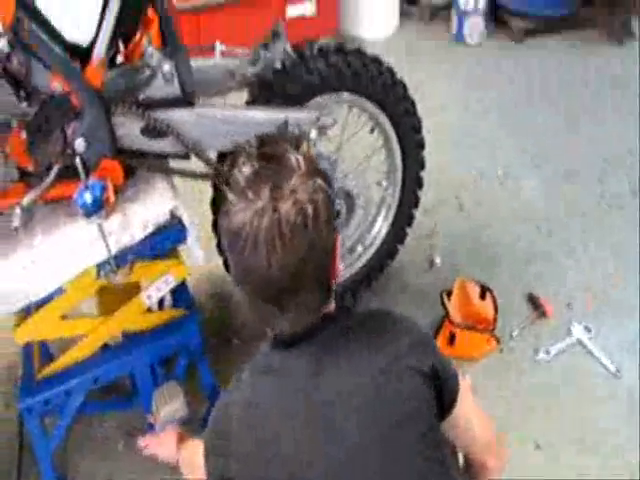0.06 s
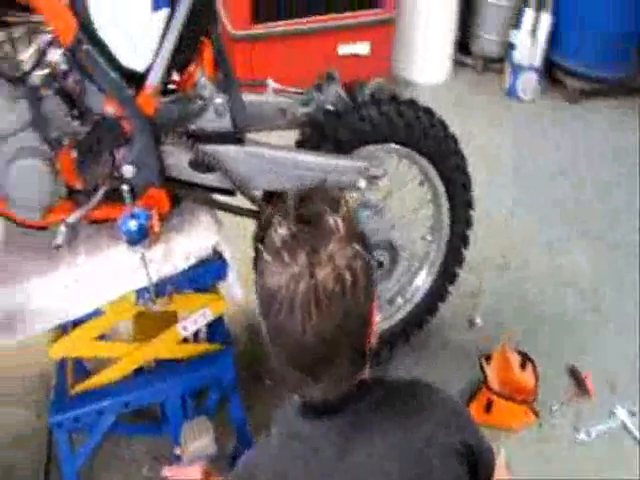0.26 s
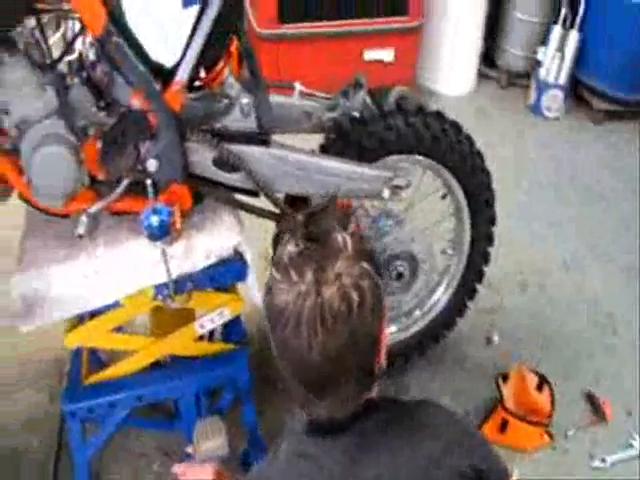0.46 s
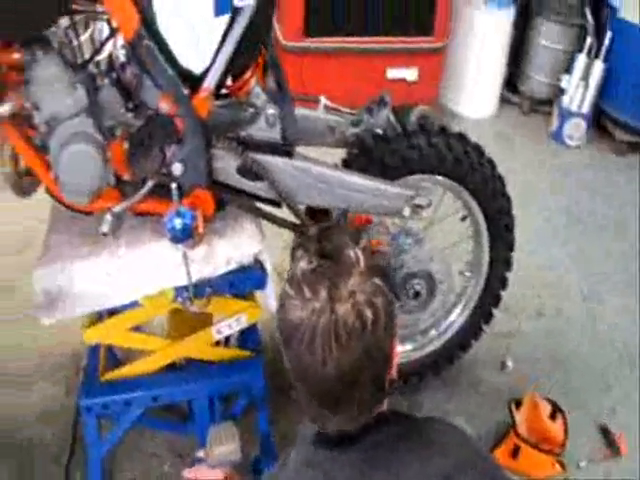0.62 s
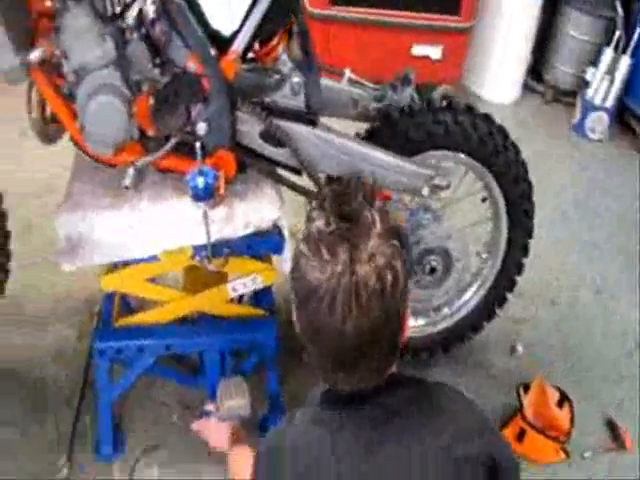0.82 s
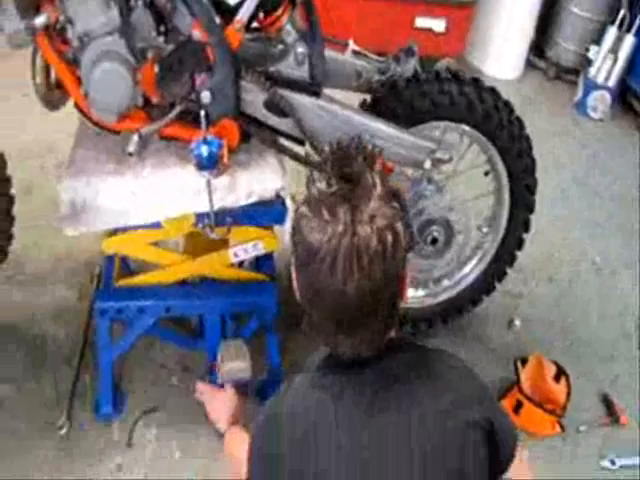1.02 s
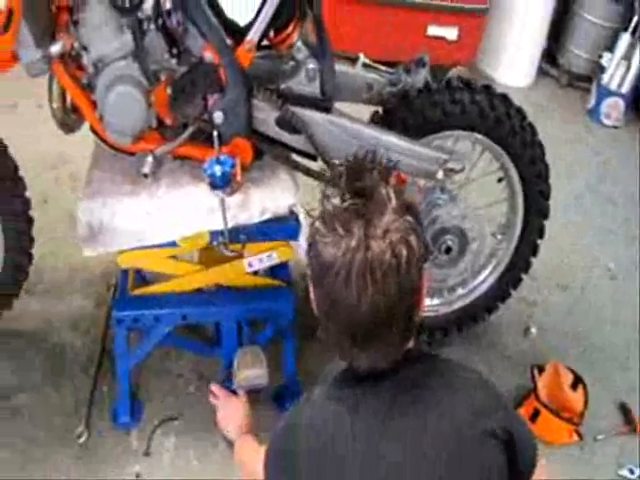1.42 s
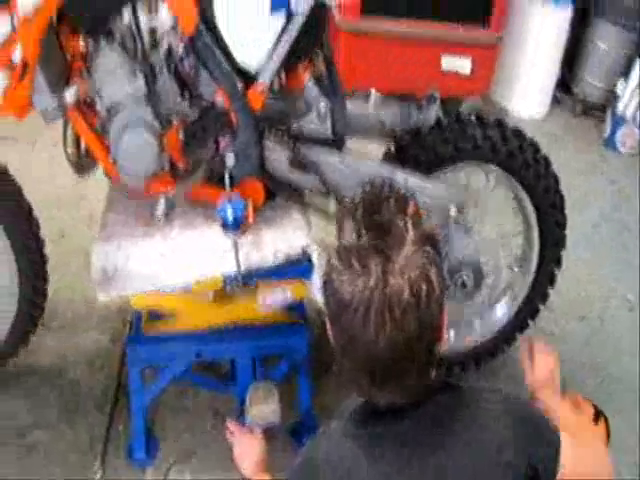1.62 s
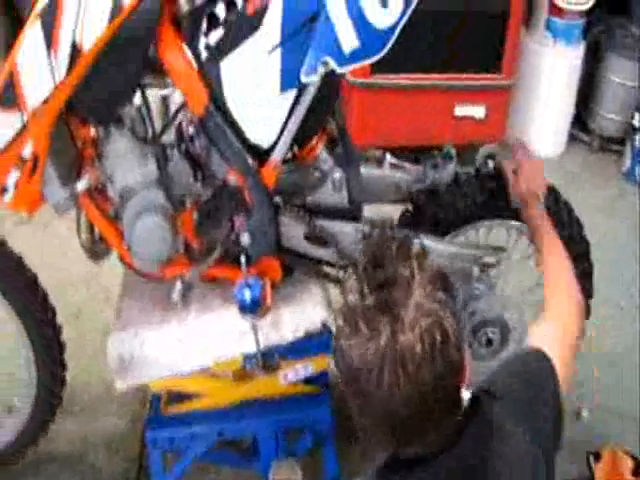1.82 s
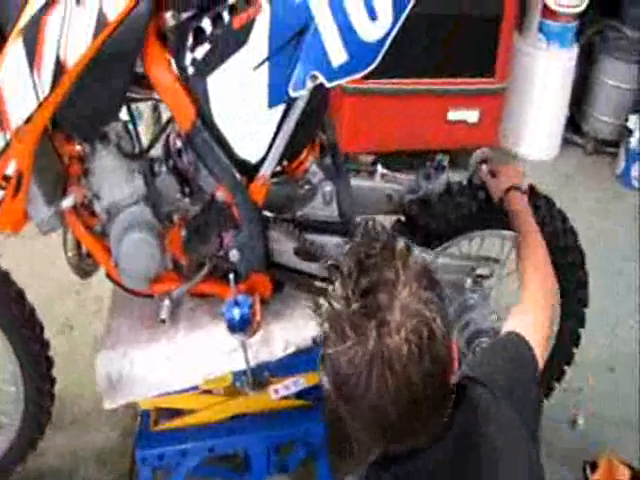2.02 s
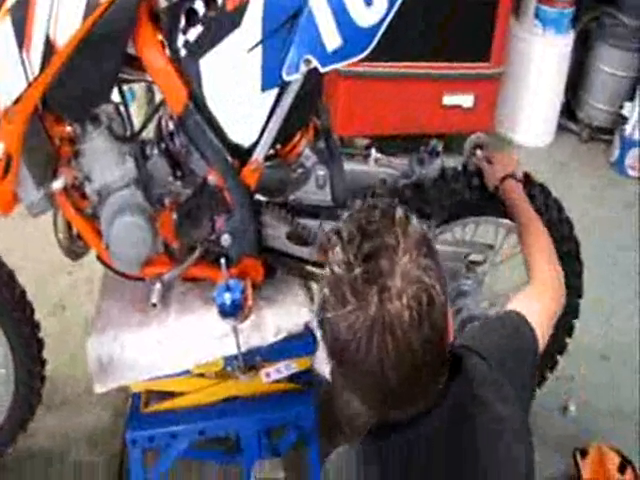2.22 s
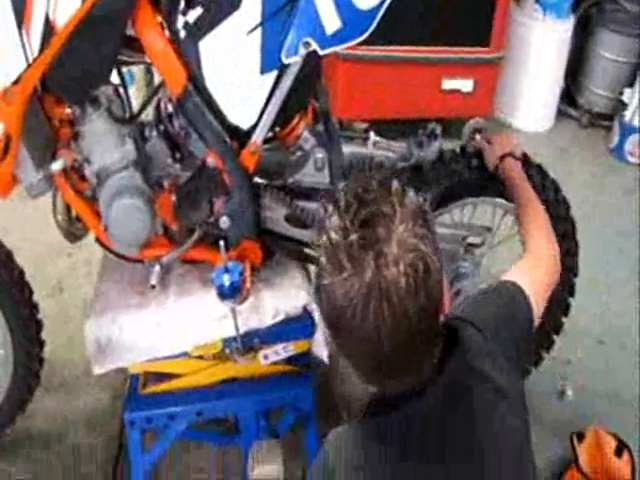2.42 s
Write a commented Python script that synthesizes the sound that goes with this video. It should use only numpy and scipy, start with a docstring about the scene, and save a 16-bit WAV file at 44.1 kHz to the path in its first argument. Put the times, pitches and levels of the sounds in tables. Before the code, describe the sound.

In a small workshop, a heavy metallic thump rattles a motorbike's loose parts as it drops onto its stand. A lighter knock comes next, and soft handling scuffs and taps continue over quiet room noise.

```python
"""A motorbike settles on its lift stand in a small workshop: a heavy, clattering thump, later a knock.
Blows ring the frame and shake loose parts; metal grinds and the flexing stand booms.
Three short stick-slip squeaks precede the knock, a stand part bouncing on its stop.
Faint scuffs and taps of hands, clothes and shoes sound over the room's wash and hum.
A gain control ducks on the thump and recovers slowly."""
import sys
import numpy as np
from scipy import signal
from scipy.io import wavfile
from scipy.ndimage import uniform_filter1d

SR = 44100
rng = np.random.default_rng(int(sys.argv[2]) if len(sys.argv) > 2 else 0)


def dump_mix(stems):
    """Bounce the given channels to the path in sys.argv[1] as a 16-bit WAV at rate SR."""
    frames = np.atleast_2d(stems).T  # one column per channel
    limited = np.clip(frames, -1, 1)  # hard clip at full scale
    pcm = np.round(limited * 32767).astype(np.int16)
    wavfile.write(sys.argv[1], SR, pcm)


N = 112454
TIME_S = np.arange(N) / SR

# room decay (frequency [Hz], t60 [s])
ROOM_DECAY = [(80, 0.13), (200, 0.46), (600, 0.28), (2000, 0.4), (6000, 0.33)]
# stereo side spectrum (frequency [Hz], gain [dB])
SIDE_EQ = [(30, -14), (150, -18.5), (370, -13.5), (750, -9.5), (1400, -5.5), (2700, -.5), (5000, -5.5),
           (10000, -7)]
# stereo balance (frequency [Hz], left minus right [dB])
BALANCE = [(700, -0.3), (1400, -0.5), (2300, -3.5), (5000, -0.5)]
# room wash spectrum (frequency [Hz], gain [dB])
WASH_EQ = [(15, -16), (30, -1.5), (204, -1), (300, -8.5), (1550, -8.5), (3170, -15.5), (4420, -15),
           (7190, -18), (11400, -32), (22000, -100)]
# room wash envelope (time [s], level [dB])
WASH_LEVELS = [(0, -45), (.18, -49), (.7, -46.5), (1.7, -43), (2.55, -40.5)]
# hum tones (frequency [Hz], level [dB])
HUM_TONES = [(57, -49.5), (268, -56)]
# rubbing strokes (start [s], length [s], gain [dB], resonance [Hz], resonance gain [dB])
SCUFF_STROKES = [(0.18, 0.098, -45.5, 450, 14), (0.787, 0.18, -53.5, 1070, 21),
                 (0.845, 0.023, -47.5, 2390, 8), (0.905, 0.055, -49, 11400, -9),
                 (1.386, 0.068, -50, 10800, -14), (1.49, 0.059, -53.5, 9000, -5),
                 (1.597, 0.052, -55, 7600, 0), (1.736, 0.14, -51.5, 2240, 1),
                 (1.83, 0.029, -44.5, 2450, -0.5), (2.014, 0.067, -51, 2350, 3), (2.46, 0.17, -51, 510, -2)]
# scuff spectrum (frequency [Hz], gain [dB])
SCUFF_EQ = [(80, -53), (300, 6), (1200, 0), (3500, 1), (5500, 5), (9000, -0.5), (11500, -2)]
# metal on metal (start [s], length [s], gain [dB], resonance [Hz])
GRINDS = [(0.228, 0.039, -32, 3360), (0.251, 0.033, -15.5, 2370), (0.248, 0.063, -15, 4670)]
# stand flexing (start [s], length [s], first pitch [Hz], last pitch [Hz], gain [dB])
BOOM_GLIDES = [(.24, 0.069, 117, 176, -16.5), (.29, 0.031, 223, 260, -9.5), (.33, 0.059, 289.6, 264, -16),
               (.374, 0.052, 204, 155, -17), (.45, 0.102, 206.3, 164, -39),
               (1.042, 0.076, 173.7, 176, -24.5)]
# bike's blows (time [s], ring gain [dB], clatter gain [dB], clatter decay [s], treble [dB])
BIKE_BLOWS = [(.244, -25, -7, 0.02, -5.5), (.255, -13, 5, 0.011, -9), (0.2636, -15, 4, 0.016, -1.5),
              (0.301, -11, 3, 0.016, 3.5), (.322, -39, -3.5, 0.024, -0.5), (.371, -33, -8.5, 0.023, 9)]
# stand and frame modes (frequency [Hz], gain [dB], t60 [s])
FRAME_MODES = [(233, -4, 0.48), (271, -5.5, 0.33), (360.8, -3, 0.33), (506.4, 2, 0.14), (581, 5, 0.12),
               (766, -2.5, 0.26), (842, -2, 0.36), (934, -9, 0.37), (1390, -12.5, 0.39), (2364, -4.5, 0.39)]
# loose-part spectrum (frequency [Hz], gain [dB])
CLATTER_EQ = [(70, -32), (125, -11), (300, 8), (700, 7.5), (1100, 6), (2400, -2), (5000, -3.5),
              (9000, -5.5), (11500, -12.5)]
# chirps (start [s], length [s], first pitch [Hz], last pitch [Hz], gain [dB], octave [dB])
SQUEAK_GLIDES = [(.851, .016, 2880, 3050, -39, -9), (.934, .019, 3850, 4100, -38.5, 2),
                 (.952, .013, 4200, 5750, -38.5, -1)]
# light contacts (time [s], ring [Hz], t60 [s], gain [dB])
TAP_CONTACTS = [(0.8823, 1090, 0.021, -28.5), (1.418, 4535, 0.037, -31), (1.446, 395, 0.041, -37.5),
                (1.783, 1910, 0.017, -31.5)]
# bounces on the stop (time [s], gain [dB], treble [dB])
KNOCK_BOUNCES = [(1.0394, -16.5, 1), (1.0472, -9, -5.5), (1.0549, -12, 7), (1.0637, -13.5, -1.5),
                 (1.072, -15.5, -8), (1.0796, -18, -5.5)]
# knock chatter spectrum (frequency [Hz], gain [dB])
KNOCK_EQ = [(50, -24), (110, 4.5), (250, 2), (420, 6), (1300, 4.5), (3500, -9), (6500, -12), (9000, -22.5),
            (11500, -33)]
# thud of the stop (frequency [Hz], gain [dB], t60 [s])
STOP_MODE = (640, -2.4, 0.0066)


def amp(db):
    """Decibels to gain."""
    return 10 ** (np.asarray(db) / 20)


def unit_rms(x):
    """Scale to rms 1."""
    return x / np.sqrt(np.mean(x ** 2) + 1e-20)


def lookup(table, hz):
    """Interpolate over log frequency."""
    table_hz, values = np.transpose(table)
    return np.interp(np.log(hz + 1), np.log(table_hz + 1), values)


def add(mix, start_s, sound):
    """Mix in place from start_s."""
    part = mix[max(round(start_s * SR), 0):][:len(sound)]
    part += sound[:len(part)]


def equalize(x, eq, size=4096):
    """Minimum-phase filter from (frequency [Hz], gain [dB]) points."""
    log_gain = np.log(amp(lookup(eq, abs(np.fft.fftfreq(size, 1 / SR)))))
    impulse = np.fft.ifft(np.exp(np.conj(signal.hilbert(log_gain)))).real[:size // 2]
    return signal.fftconvolve(x, impulse)[:len(x)]


def resonate(x, hz, width_hz):
    """One resonance, peak gain 1."""
    return signal.lfilter(*signal.iirpeak(hz, hz / width_hz, SR), x)


def drift(n, rate_hz):
    """Random wander, rms near 1."""
    return np.interp(np.arange(n) * rate_hz / SR, np.arange(4096), rng.standard_normal(4096))


def arch(n):
    """Half-sine envelope."""
    return np.sin(np.linspace(0, np.pi, n))


def grains(spread_db, size=16384):
    """Noise in 32-sample grains of random strength; spread 0 is plain white noise."""
    grain_db = spread_db * np.minimum(rng.exponential(1, size // 32), 4)
    return unit_rms(rng.standard_normal(size) * np.repeat(amp(grain_db), 32))


def burst(decay_s, spread_db, rise_s=0.0011):
    """Decaying contact chatter, energy 1."""
    noise = grains(spread_db)
    t = TIME_S[:len(noise)]
    chatter = noise * np.exp(-t / decay_s) * (1 - np.exp(-t / rise_s))
    return chatter / np.linalg.norm(chatter)


def ring(hz, db, t60_s, rise_s):
    """One struck mode."""
    t = TIME_S[:SR]
    envelope = amp(db - 60 * t / t60_s) * (1 - np.exp(-t / rise_s))
    return envelope * np.sin(2 * np.pi * hz * t)


def stereo(mid, side):
    """Mid/side to left/right: narrow bass, wide treble, right slightly louder, most near 2.3 kHz."""
    side = equalize(side, SIDE_EQ)
    return np.array([equalize(mid + sign * side, [(hz, sign * db / 2) for hz, db in BALANCE])
                     for sign in (1, -1)])


def reflections(size=32768, rate_hz=4000, predelay_s=0.003):
    """Sparse echoes, each band with its own decay; energy 1."""
    echoes = rng.standard_normal(size) * (rng.random(size) < rate_hz / SR)
    echoes *= np.arange(size) > predelay_s * SR
    hz, t, spectrum = signal.stft(echoes, SR, nperseg=256)
    decay = amp(-60 * t / lookup(ROOM_DECAY, hz)[:, None])
    tail = signal.istft(spectrum * decay, SR, nperseg=256)[1]
    return tail / np.linalg.norm(tail)


def reverb(x, count=3, rotation_hz=25):
    """Successive moments excite different reflection patterns."""
    phase = 2 * np.pi * rotation_hz * TIME_S
    feeds = [x * np.cos(phase + np.pi * k / count) for k in range(count)]
    return sum(signal.oaconvolve(feed, reflections())[:N] for feed in feeds) * np.sqrt(2 / count)


def room(x, direct_db, wet_db, side_db=0):
    """Direct sound, scattered in the side channel, plus workshop reverb."""
    scatter = rng.standard_normal(256)
    scattered = signal.oaconvolve(x, scatter / np.linalg.norm(scatter))[:N]
    side = amp(direct_db) * scattered + amp(wet_db) * reverb(x)
    mid = amp(direct_db) * x + amp(wet_db) * reverb(x)
    return stereo(mid, amp(side_db) * side)


def room_tone():
    """Noise wash that dips, then slowly grows, and a wavering low hum."""
    mid, side = [equalize(rng.standard_normal(N), WASH_EQ) for _ in range(2)]
    wash_db = np.interp(TIME_S, *np.transpose(WASH_LEVELS)) + 0.5 * drift(N, rate_hz=10)
    hum = np.zeros(N)
    for hz, db in HUM_TONES:
        flutter = 1 + 0.17 * drift(N, rate_hz=8.7)
        waver_rad = 1.8 * drift(N, rate_hz=12)
        hum += amp(db) * flutter * np.sin(2 * np.pi * hz * TIME_S + waver_rad)
    return amp(wash_db) * unit_rms(stereo(mid, side)) + hum


def scuffs():
    """Hands, clothes and shoes rub: noise strokes, one broad resonance each."""
    out = np.zeros(N)
    for start_s, length_s, db, hz, peak_db in SCUFF_STROKES:
        noise = grains(spread_db=0)
        peak = 3 * amp(peak_db) * resonate(noise, hz, width_hz=870)
        stroke = unit_rms(noise + peak)[:int(length_s * SR)]
        add(out, start_s, amp(db) * stroke * arch(len(stroke)))
    return room(equalize(out, SCUFF_EQ), direct_db=7.5, wet_db=6.5)


def grinds(q=1.3, pan_db=2.5):
    """Metal grinds on metal as the bike comes down, off to the right."""
    out = np.zeros(N)
    for start_s, length_s, db, hz in GRINDS:
        noise = resonate(grains(spread_db=1), hz, hz / q)
        stroke = unit_rms(resonate(noise, hz, hz / q)[:int(length_s * SR)])
        add(out, start_s, amp(db) * stroke * arch(len(stroke)))
    return room(out, direct_db=-2.5, wet_db=-6.5, side_db=7.5) * amp([[-pan_db], [pan_db]])


def booms():
    """Low stand resonances swell and bend as the load shifts."""
    out = np.zeros(N)
    for start_s, length_s, first_hz, last_hz, db in BOOM_GLIDES:
        n = int(length_s * SR)
        phase = 2 * np.pi * np.cumsum(np.linspace(first_hz, last_hz, n)) / SR
        add(out, start_s, amp(db) * arch(n) * np.sin(phase))
    return room(out, direct_db=0, wet_db=-10)


def thump():
    """A run of blows rings the frame and shakes its loose parts."""
    frame, clatter = np.zeros(N), np.zeros(N)
    modes = sum(ring(*mode, rise_s=0.00089) for mode in FRAME_MODES)
    for time_s, ring_db, clatter_db, decay_s, treble_db in BIKE_BLOWS:
        add(frame, time_s, amp(ring_db) * modes)
        rattle = equalize(burst(decay_s, spread_db=0.5), [(1200, 0), (6000, treble_db)])
        add(clatter, time_s, amp(clatter_db) * rattle)
    clatter = equalize(clatter, CLATTER_EQ)
    return room(frame, direct_db=0, wet_db=-8.5) + room(clatter, direct_db=15.5, wet_db=21, side_db=-1)


def squeaks(jitter=0.022):
    """Rising stick-slip chirps with their octave, perhaps a shoe on the floor."""
    out = np.zeros(N)
    for start_s, length_s, first_hz, last_hz, db, octave_db in SQUEAK_GLIDES:
        n = int(length_s * SR)
        pitch_hz = np.linspace(first_hz, last_hz, n) * (1 + jitter * drift(n, rate_hz=830))
        phase = 2 * np.pi * np.cumsum(pitch_hz) / SR
        tone = np.sin(phase) + amp(octave_db) * np.sin(2 * phase)
        add(out, start_s, amp(db) * arch(n) * tone)
    return room(out, direct_db=0, wet_db=-6)


def taps(click_gain_db=10):
    """Light hand and tool contacts: one short ring and a click."""
    out = np.zeros(N)
    for time_s, hz, t60_s, db in TAP_CONTACTS:
        add(out, time_s, ring(hz, db, t60_s, rise_s=0.00067))
        add(out, time_s, amp(db + click_gain_db) * burst(decay_s=0.0028, spread_db=7))
    return room(out, direct_db=0, wet_db=-4)


def knock():
    """A stand part drops on its stop and bounces; each contact chatters and thuds."""
    chatter, thuds = np.zeros(N), np.zeros(N)
    for time_s, db, treble_db in KNOCK_BOUNCES:
        contact = equalize(burst(decay_s=0.0069, spread_db=4.5), [(1500, 0), (5000, treble_db)])
        add(chatter, time_s, amp(db) * contact)
        add(thuds, time_s, amp(db) * ring(*STOP_MODE, rise_s=0.00025))
    chatter = equalize(chatter, KNOCK_EQ)
    return room(chatter, direct_db=17.5, wet_db=20) + room(thuds, direct_db=-1, wet_db=-2)


def scene():
    """Bike and stand, handling, room tone; stereo."""
    return thump() + grinds() + booms() + knock() + taps() + scuffs() + squeaks() + room_tone()


def record(dry, threshold_db=-19, duck_db_per_db=0.56, hold_fall_db_per_s=23.5, cutoff_hz=11570):
    """Gain control with slow recovery, hard clipping, low-pass."""
    power = abs(uniform_filter1d((dry ** 2).mean(0), size=500))
    power_db = 10 * np.log10(power + 1e-12)
    fall_db = TIME_S * hold_fall_db_per_s
    held_db = np.maximum.accumulate(power_db + fall_db) - fall_db  # decaying peak hold
    over_db = np.maximum(held_db - threshold_db, 0)
    duck_db = duck_db_per_db * uniform_filter1d(over_db, size=200)
    clipped = np.clip(dry / amp(duck_db), -1, 1)
    lowpass = signal.firwin(801, cutoff_hz, window=("kaiser", 9), fs=SR)
    return signal.oaconvolve(clipped, lowpass[None], "same")


dry = scene()
out = record(dry)
dump_mix(out)
```